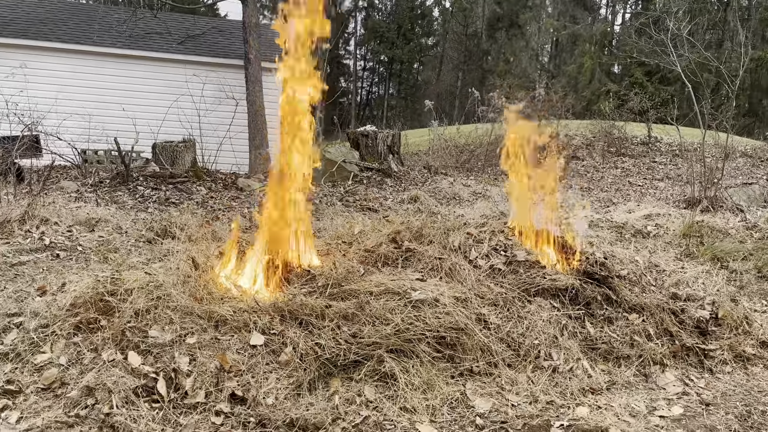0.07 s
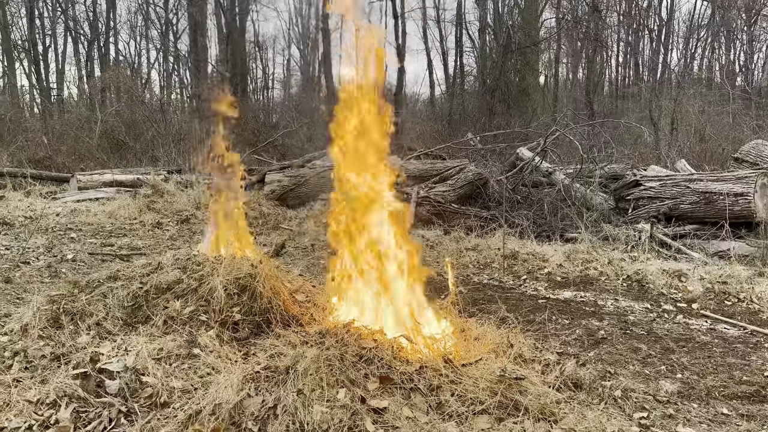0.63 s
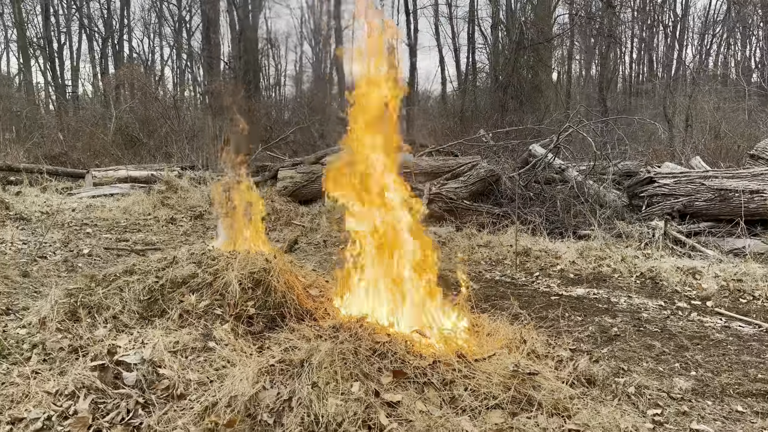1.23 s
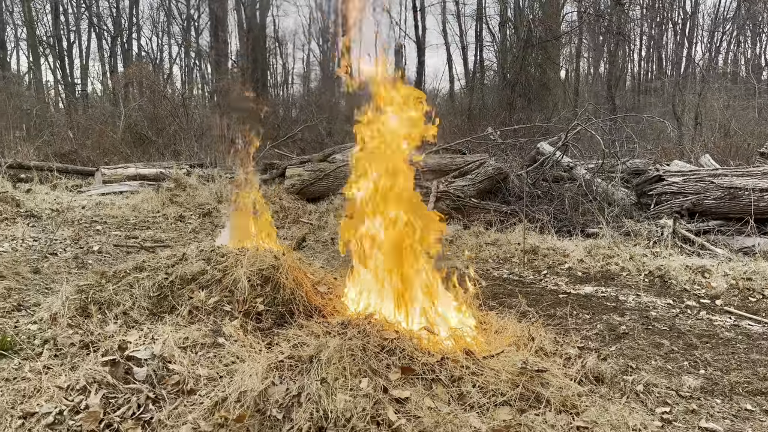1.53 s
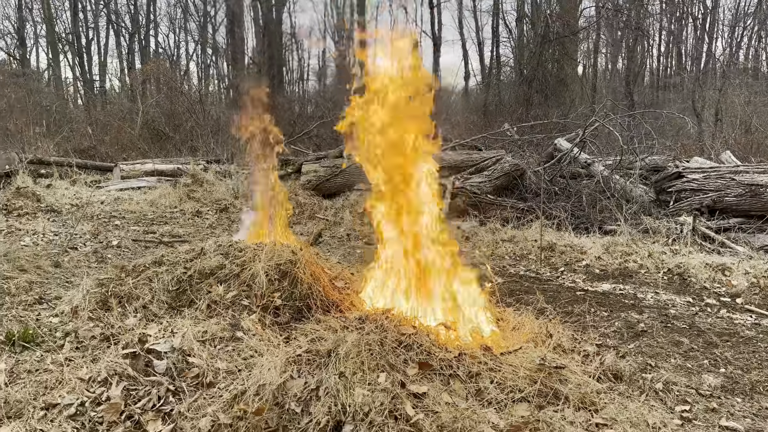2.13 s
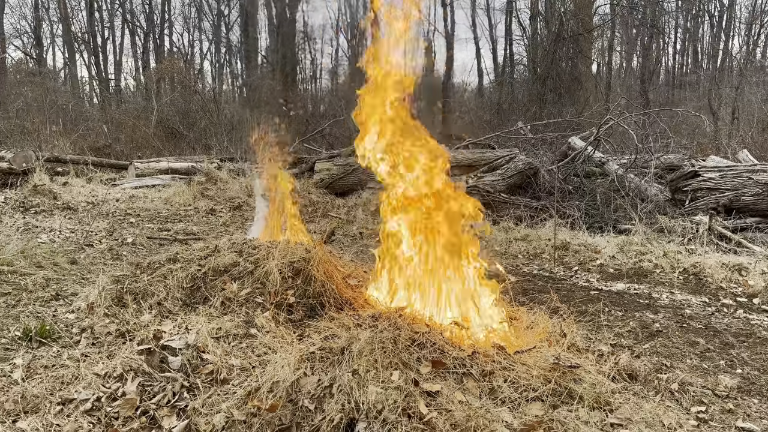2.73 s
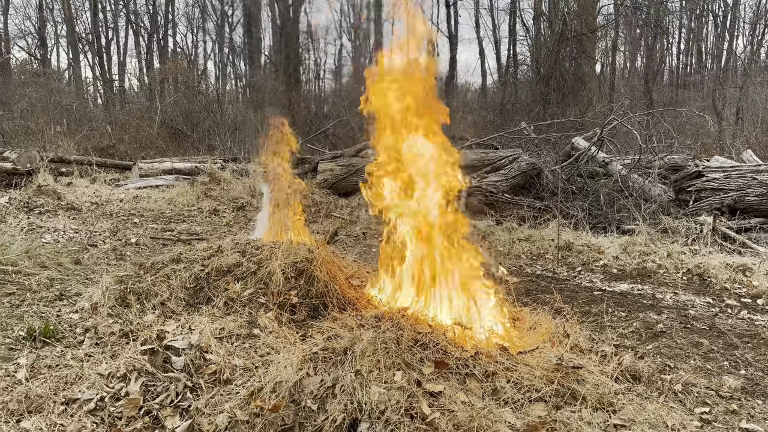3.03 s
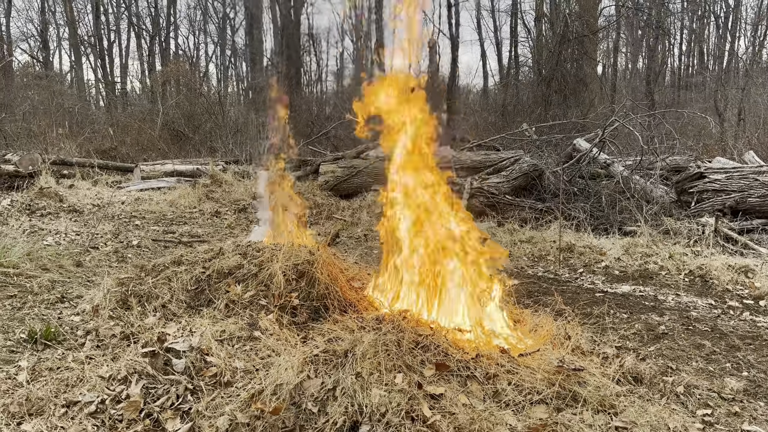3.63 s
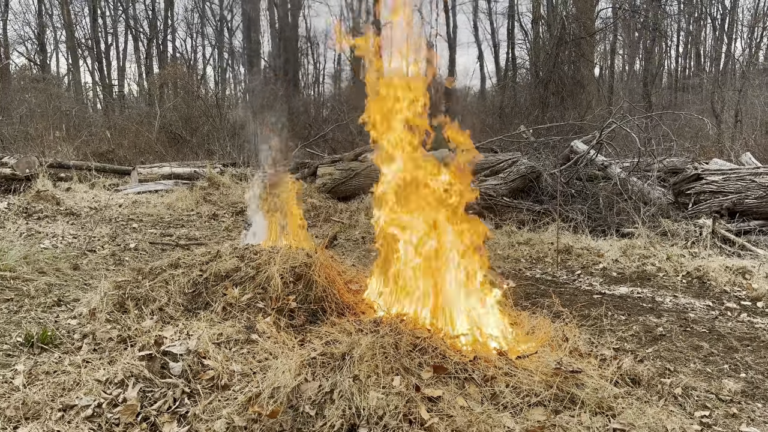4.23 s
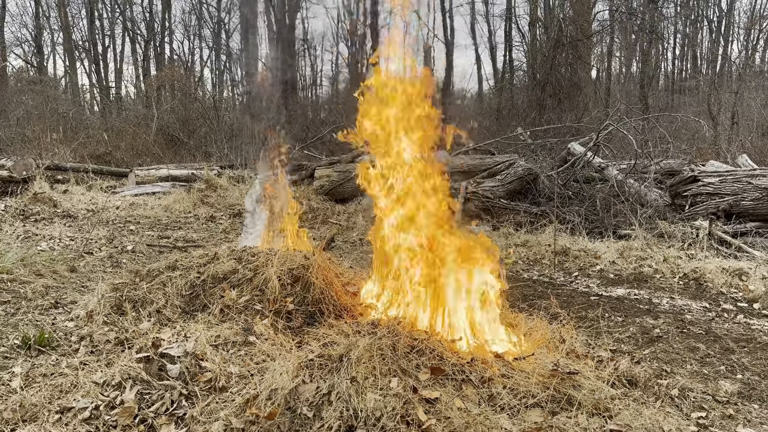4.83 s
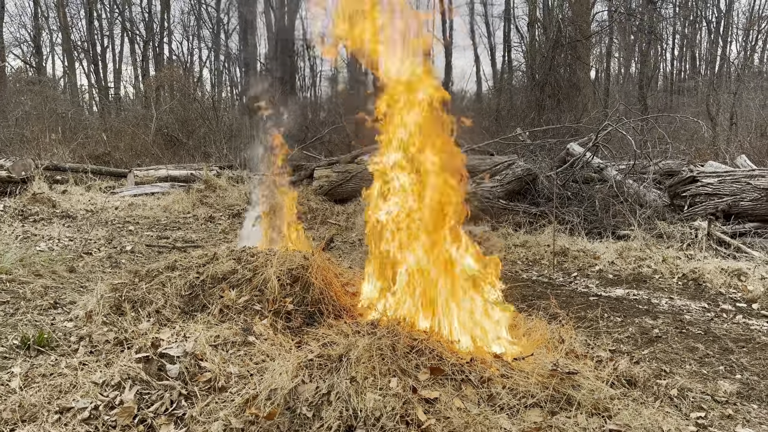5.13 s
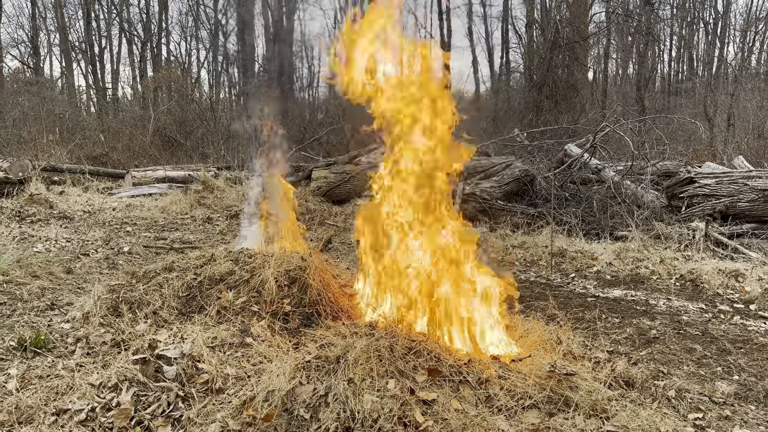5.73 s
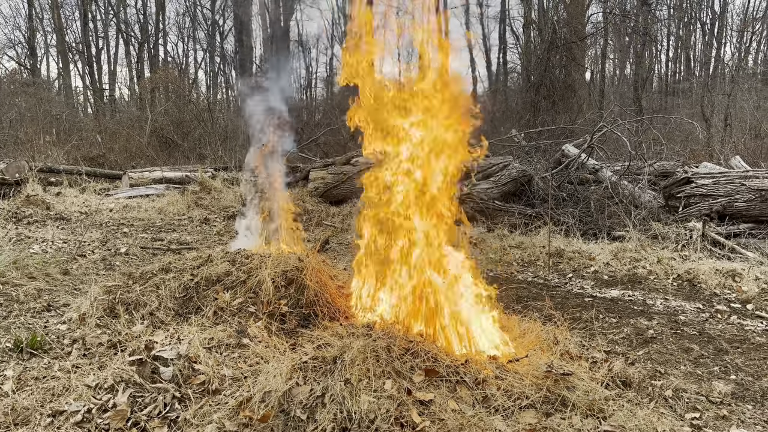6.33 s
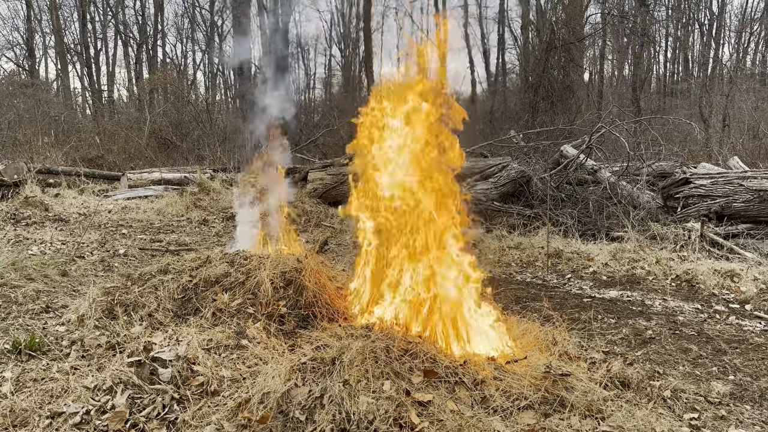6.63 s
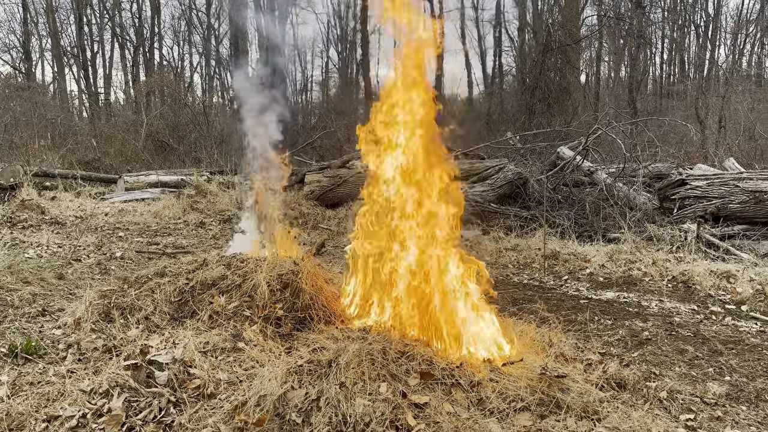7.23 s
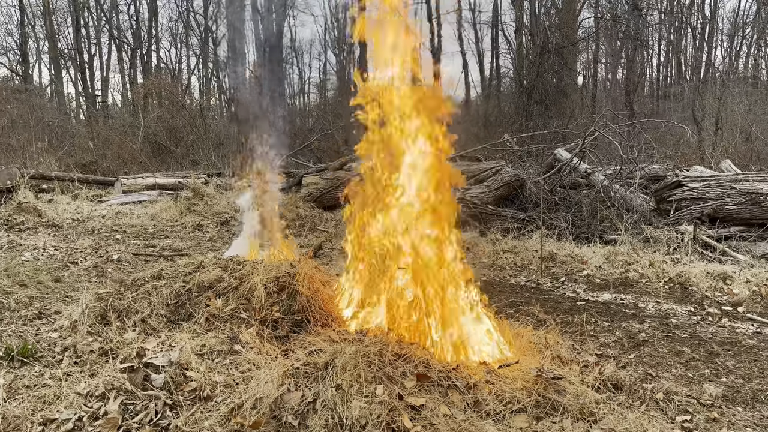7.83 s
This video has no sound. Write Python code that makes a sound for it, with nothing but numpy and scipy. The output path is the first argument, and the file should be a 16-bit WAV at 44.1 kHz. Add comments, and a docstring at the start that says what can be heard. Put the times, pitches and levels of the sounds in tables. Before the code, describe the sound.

A heap of dry weeds and grass burns in an open yard for about eight seconds, a few steps from the microphone. Thin blades crackle densely over a soft sizzle, while thicker stalks burst in sharp, irregular pops, many each second, with faint echoes. Underneath, the flames flutter and give a deep, gently wavering roar, fullest around 2.5 seconds.

A sharp pop comes right at the start. Just before 0.5 seconds the flame gives a soft whump and the whole sound drops out for an instant. Further soft whumps come near 1.6, 1.8 and 3.8 seconds. Stronger pops stand out around 1.9 seconds, and the sharpest crack lands at 6.6. Vapour spurts briefly at 2.7 seconds and more clearly at 7.1, followed by a faint, very brief ring at 7.2. The crackle grows slightly busier and continues to the end.

```python
"""A burning heap of dry weeds and grass, in an open yard, a few steps from a two-port stereo microphone.
The flame column drones and roars, and its tongues flutter and flare. Thick stalks burst in sharp pops
over a dense crackle of thin blades and a soft sizzle of tiny snaps. Vapour spurts from split stalks.
Logs and tree trunks return faint echoes of the snaps. The whole sound drops out for an instant
just before half a second, and a faint, very brief tone rings once near the end."""
import sys
import numpy as np
from scipy import signal
from scipy.fft import rfft, irfft, next_fast_len
from scipy.io import wavfile
from scipy.ndimage import uniform_filter1d

SR = 44100
rng = np.random.default_rng(int(sys.argv[2]) if len(sys.argv) > 2 else 0)


def dump(signal):
    """Clip the signal to [-1, 1] and save it as 16-bit WAV at the path in sys.argv[1]."""
    limited = np.clip(np.atleast_2d(signal).T, -1, 1)
    pcm = np.round(limited * 32767).astype(np.int16)
    wavfile.write(sys.argv[1], SR, pcm)


N = 356769

# strength of the flame column: (time [s], relative drone level [dB], relative roar level [dB])
COLUMN_LEVELS = [(0, -48, -46), (0.33, -51, -39), (0.58, -38.5, -35), (1.85, -34.5, -40),
                 (2.22, -36.5, -34.5), (2.45, -30, -40.5), (2.85, -47.5, -37.5), (3.3, -40, -36),
                 (3.7, -52, -38), (4.1, -36.5, -37.5), (4.7, -44, -42), (5.1, -39, -38.5),
                 (5.6, -43, -41.5), (6.15, -40.5, -39), (6.9, -42.5, -43.5), (7.35, -45.5, -40),
                 (8.08, -40.5, -41)]
# the column's deep drone: (frequency [Hz], relative level [dB])
DRONE_SPECTRUM = [(20, -42), (32, -11), (44, -3), (51, 7), (55, 8.5), (60, 3.5), (68, -9), (90, -53),
                  (200, -80)]
# the column's roar: (frequency [Hz], relative level [dB])
ROAR_SPECTRUM = [(25, -47), (48, -6), (62, 2.5), (72, 9), (82, 1), (92, 5), (102, -7), (135, -14),
                 (200, -39), (400, -75)]
# flutter of the flame tongues, before flicker: (time [s], level [dB])
TONGUE_LEVEL = [(0, -50), (1.0, -46.5), (2.3, -47.5), (3.4, -46), (5.0, -47.5), (6.1, -46.5), (6.8, -46.5),
                (7.25, -45), (8.09, -46)]
# colour of that flutter: (frequency [Hz], relative level [dB])
TONGUE_SPECTRUM = [(30, -30), (80, -15.5), (125, 2.5), (175, -2), (270, -6), (340, -11), (430, -17),
                   (800, -19), (1400, -24), (3000, -45)]
# a tongue flares with a soft whump: (time [s], relative peak level [dB])
TONGUE_FLARES = [(0.424, -25), (1.584, -29.5), (1.791, -28), (3.826, -30)]
# how fast fresh grass catches: (time [s], relative level [dB])
BURN_LEVEL = [(0.0, -59), (0.4, -59.5), (0.59, -54.5), (1.08, -55), (1.76, -53.5), (2.2, -57), (2.7, -57),
              (2.93, -53), (3.2, -51), (3.83, -54), (4.15, -52.5), (4.85, -51.5), (5.2, -53), (5.8, -53),
              (6.02, -52), (6.35, -52), (6.58, -50), (6.93, -54), (7.18, -48.5), (7.5, -54), (8.09, -50)]
# hiss of the tiniest snaps: (frequency [Hz], relative level [dB])
SIZZLE_SPECTRUM = [(300, -9), (600, 8.5), (900, 5.5), (1300, -5.5), (2200, 4.5), (4000, 4.5), (5500, 6),
                   (10000, 0), (13000, 4.5), (15800, -15), (17000, -30)]
# vapour escaping from split stalks: (time [s], relative level [dB], decay [s])
VAPOUR_SPURTS = [(2.742, -44, 0.0096), (6.635, -54, 0.05), (7.133, -36, 0.036)]
# the knock, crack and tick registers of a snap: (low edge [Hz], high edge [Hz])
SNAP_BANDS = [(470, 1370), (1600, 5710), (6800, 15400)]
# the thickest stalks bursting, and the loudest snaps of thin blades: (time [s], ring [Hz], relative level [dB],
# tilt toward treble [dB])
LOUD_SNAPS = [(0.01, 1320, -20, 6.5), (0.101, 1700, -42, -3.5), (0.2282, 12500, -47.5, 14.5),
              (0.2982, 7500, -39, -1), (0.3935, 6300, -38, 2), (0.4176, 1200, -38, 7),
              (0.4523, 10500, -47, 9), (0.4994, 10500, -35.5, -7), (0.5179, 3500, -41.5, -2),
              (0.53, 4500, -43, 3), (0.5485, 7600, -30.5, -1.5), (0.5842, 4500, -46, 5),
              (0.6446, 10500, -45.5, 5), (0.677, 890, -35, 6), (0.734, 10800, -27, -1),
              (0.7679, 10500, -29.5, -2), (0.8213, 9600, -38, 3), (0.835, 5150, -30, 3),
              (0.9539, 4130, -32, 3), (1.0293, 5800, -33, -1.5), (1.059, 870, -32, 8.5),
              (1.132, 10500, -38.5, -3), (1.1783, 10500, -43, 6), (1.1949, 10500, -44, 5),
              (1.2341, 10500, -34, -2), (1.2692, 7900, -30.5, -1), (1.279, 1250, -25, 3),
              (1.287, 10500, -39, -1), (1.3373, 7800, -38, 1), (1.3672, 870, -31, 12.5),
              (1.5871, 10900, -25.5, -5.5), (1.6023, 9610, -28.5, -2), (1.6107, 6000, -26.5, 0),
              (1.7106, 726, -25.5, 11), (1.718, 10500, -36.5, 1), (1.7591, 6200, -29.5, 3),
              (1.8784, 7500, -41, 0), (1.9034, 720, -18.5, 10.5), (1.934, 2000, -43, 11),
              (2.0136, 10500, -39, 0), (2.043, 2320, -22.5, 0.5), (2.149, 1430, -29, 1),
              (2.156, 10500, -41, 0.5), (2.1764, 10500, -39, 1), (2.2057, 13000, -33.5, -0.5),
              (2.2896, 7900, -32.5, -4.5), (2.3032, 5700, -41.5, 8.5), (2.349, 7600, -32.5, 1),
              (2.406, 885, -35.5, 11), (2.4576, 7660, -34, 0), (2.4737, 710, -26.5, 14.5),
              (2.5554, 7500, -37, 0), (2.7305, 9370, -31, 2), (2.7528, 7860, -32, -10),
              (2.7672, 11500, -24.5, -4), (2.7886, 1400, -34, 3), (2.817, 1960, -35, 10.5),
              (2.8532, 2480, -30, 5.5), (2.8885, 10500, -33, -9), (2.902, 13000, -31.5, 1),
              (2.934, 796, -30, 14), (3.0042, 9200, -36.5, 0), (3.0183, 9000, -43, 1),
              (3.0629, 8910, -31, -7), (3.1046, 1500, -32, 5), (3.1253, 9100, -30.5, 2.5),
              (3.1427, 7500, -54, -2), (3.163, 5200, -33.5, 1), (3.173, 10500, -44, 8),
              (3.184, 13000, -32, -1), (3.246, 880, -30.5, 11), (3.254, 7600, -42, 5),
              (3.2777, 7500, -47, 3), (3.2906, 2600, -29.5, 4.5), (3.3053, 7860, -31, -6),
              (3.328, 2600, -32.5, 7), (3.3424, 10500, -45, 5), (3.389, 780, -25.5, 13.5),
              (3.4221, 4700, -39.5, 4), (3.523, 6000, -40, 0), (3.5672, 5100, -36, -4),
              (3.6017, 7500, -38, -3), (3.6633, 1320, -31.5, 10), (3.6826, 6400, -36, 1),
              (3.7261, 2000, -31.5, 9.5), (3.763, 5500, -38, 0), (3.781, 7470, -35.5, 3),
              (3.814, 1930, -30.5, 11.5), (3.9413, 4700, -38, -3), (3.9635, 1770, -30.5, 10),
              (3.9843, 10500, -41, 2), (4.032, 3000, -33.5, 1), (4.052, 804, -30.5, 4.5),
              (4.0614, 7000, -32, 3), (4.112, 3900, -35.5, 1), (4.1425, 10900, -29, -2.5),
              (4.1572, 9400, -34, 1), (4.257, 1600, -38, 1), (4.293, 10500, -36.5, -1.5),
              (4.308, 3420, -44.5, 17), (4.386, 13000, -44, 10), (4.4214, 9900, -30.5, -1),
              (4.428, 6500, -33.5, 0), (4.464, 3600, -30.5, 2.5), (4.5331, 1500, -39, -2),
              (4.5455, 3100, -40, -5), (4.554, 12100, -29, -5.5), (4.611, 12400, -31, -0.5),
              (4.6318, 8690, -33, 0), (4.6682, 7500, -39, -1), (4.763, 3070, -38.5, 4),
              (4.8124, 4290, -33.5, 4), (4.84, 4500, -43, 1), (4.893, 1000, -33, 6.5),
              (4.9205, 1600, -36.5, 2), (4.9595, 4500, -48, 4), (4.9828, 1320, -34.5, 12.5),
              (5.157, 7500, -40.5, 1), (5.185, 7000, -34, 2.5), (5.335, 8800, -46, 7),
              (5.3967, 2040, -31, 8), (5.423, 7660, -30.5, -2), (5.5771, 10500, -40, -2),
              (5.653, 8000, -32.5, -5), (5.9055, 3500, -42.5, 8), (5.95, 5500, -36.5, 2),
              (5.978, 3730, -35.5, -3), (6.0257, 6460, -29, 2), (6.089, 10500, -37, 0.5),
              (6.1398, 7900, -35, -3), (6.1757, 7100, -29, -4.5), (6.228, 10500, -34.5, -3.5),
              (6.2833, 7500, -43, 1), (6.3227, 7500, -44, -1), (6.435, 10000, -41, 3),
              (6.462, 3000, -41, 12), (6.477, 1300, -32.5, 5.5), (6.5494, 8900, -24.5, -2),
              (6.562, 7500, -35, 1), (6.585, 7600, -31, 3), (6.6102, 3800, -16, 0.5),
              (6.646, 2000, -40, 3), (6.6757, 4320, -33, 5), (6.6891, 650, -29, 11),
              (6.726, 8200, -31.5, -2), (6.784, 4540, -34.5, 2.5), (6.796, 9000, -37, 0),
              (6.8273, 7500, -40, -6), (6.9172, 4450, -34, 5), (7.0069, 6000, -42, 0),
              (7.032, 1080, -27.5, -1), (7.0483, 9000, -32, -6), (7.0574, 7100, -29.5, -4.5),
              (7.1217, 10400, -31.5, 1), (7.1332, 1090, -23, 10), (7.141, 4630, -34, 9),
              (7.203, 8690, -32, -3.5), (7.309, 9860, -31.5, -3), (7.3424, 10500, -40, 0),
              (7.356, 1490, -29, 5), (7.3838, 2450, -27, -0.5), (7.501, 7400, -32.5, 1.5),
              (7.535, 10500, -41.5, 5), (7.5469, 746, -31, 6.5), (7.6317, 7500, -42, 0),
              (7.6546, 1800, -37, 2), (7.669, 4000, -42, 2), (7.716, 7500, -41.5, 3),
              (7.7242, 5000, -41, 5), (7.7644, 667, -25, 8), (7.775, 900, -35, 8),
              (7.799, 10200, -30, -5.5), (7.8306, 1890, -33.5, 5), (7.869, 1640, -35.5, -3.5),
              (7.9165, 2000, -40, 7), (8.029, 950, -31, 7.5)]
# a brief dropout of the whole sound: (time [s], gain [dB])
DROPOUT = [(.455, 0), (.466, -20), (.474, -18), (.492, 0)]
# width of diffuse sound at the microphone: (frequency [Hz], relative side minus mid [dB])
DIFFUSE_WIDTH = [(40, -31), (80, -25), (160, -21), (330, -15), (600, -2.5), (1600, -3), (1900, -24),
                 (3200, 1.5), (4300, -20), (5300, 6), (8300, -36), (12000, -22), (13500, -9), (15500, -17)]
# colour shared by both microphone ports: (frequency [Hz], gain [dB])
MIC_COLOUR = [(500, 5), (820, 4), (1100, -2), (1350, 2), (1615, -2.5), (1680, 0), (1900, -1.04),
              (2600, -0.2), (3200, -0.96), (4400, -0.1), (5250, -4), (7000, -0.5), (8300, -1),
              (10500, -0.5), (13500, -2), (15700, -6), (16500, -31)]
# balance between the ports: (frequency [Hz], left minus right [dB])
MIC_BALANCE = [(300, 12), (550, 4.5), (850, 1.5), (1100, 2.5), (1500, 0), (2200, 0.5), (3200, 5),
               (3800, 2.5), (5200, 2.5), (6500, 1.3), (9000, -0.5), (16000, 0.5)]
# phase between the ports: (frequency [Hz], left lead [rad])
MIC_PHASE = [(300, -1.5), (750, 0.5), (1000, 0.3), (1200, -1.78), (1570, 3), (1800, -0.5), (2900, 1.07),
             (3800, 0.64), (4700, 0.96), (5500, -1.1), (6700, -1.48), (8300, -3), (11000, -5.5),
             (13000, -6.5), (15000, -10.5)]

SIDES = np.array([[.5], [-.5]])   # splits a difference between left and right


def from_db(db):
    """Decibels to gain."""
    return 10 ** (np.asarray(db) / 20)


def rms_one(x):
    """Scale to rms 1."""
    return x / np.sqrt(np.mean(x ** 2) + 1e-20)


def in_time(rows):
    """The columns of a curve table at every sample."""
    s, *columns = np.transpose(rows)
    return [np.interp(np.arange(N) / SR, s, c) for c in columns]


def at_hz(points, hz):
    """Read a spectrum on a log-frequency axis."""
    f, value = np.transpose(points)
    return np.interp(np.log(hz + 1e-9), np.log(f), value)


def drift(rate_hz):
    """A random wander of rms 1 that turns about rate_hz times a second."""
    beats = np.arange(N) / SR * rate_hz
    return rms_one(np.interp(beats, np.arange(4096), rng.standard_normal(4096)))


def stereo_noise(spectrum, side_db):
    """Diffuse coloured noise at the microphone, rms 1; side_db widens it."""
    size = next_fast_len(N, real=True)
    hz = np.fft.rfftfreq(size, 1 / SR)
    mid, side = rfft(rng.standard_normal((2, size)))
    width = from_db(at_hz(DIFFUSE_WIDTH, hz) + side_db)
    pair = (mid + width * side * 2 * SIDES) / np.sqrt(1 + width ** 2)
    return rms_one(irfft(pair * from_db(at_hz(spectrum, hz)), size)[:, :N])


def flame_column(drone_gain_db=-1, evenness=0.64, puff_s=0.097):
    """The flame column over the heap drones and roars in deep puffs."""
    drone_db, roar_db = in_time(COLUMN_LEVELS)
    drone = stereo_noise(DRONE_SPECTRUM, side_db=-6.0)
    roar = stereo_noise(ROAR_SPECTRUM, side_db=-1.5)
    column = from_db(drone_db + drone_gain_db) * drone + from_db(roar_db) * roar
    swell = np.sqrt(uniform_filter1d((drone[0] + roar[0]) ** 2, int(puff_s * SR)) / 2 + 1e-6)
    return column / swell ** evenness   # a steady draught evens out the puffs


def flame_tongues(flicker_db=2.5, flare_gain_db=-7, flare_peak_s=0.0032, flare_width_s=0.0058):
    """Tongues of flame flutter steadily, and now and then one flares up."""
    steady_db, = in_time(TONGUE_LEVEL)
    level = from_db(steady_db + flicker_db * drift(60))
    for s, peak_db in TONGUE_FLARES:
        from_peak_s = np.arange(N) / SR - s - flare_peak_s
        level += from_db(peak_db + flare_gain_db) * np.exp(-(from_peak_s / flare_width_s) ** 2)
    return level * stereo_noise(TONGUE_SPECTRUM, side_db=2.0)


def sizzle(burn_db, gain_db=-4.0, grain_db=3.5, spurt_rise_s=0.001):
    """Countless tiny snaps merge into a grainy hiss, which swells where a split stalk lets out vapour."""
    level = from_db(burn_db + gain_db)
    for s, spurt_db, decay_s in VAPOUR_SPURTS:
        age = np.maximum(np.arange(N) / SR - s, 0)
        level += from_db(spurt_db) * np.exp(-age / decay_s) * (1 - np.exp(-age / spurt_rise_s))
    grain = from_db(grain_db * drift(450))
    return level * grain * stereo_noise(SIZZLE_SPECTRUM, side_db=-4.5)


def ground_bounce(hz, count, bounce_db=-6.5, bounce_s=0.001124, spread=0.21, dull_hz=4000):
    """The ground returns each snap, duller and about a millisecond late: a hollow, woody colour."""
    delay_s = bounce_s * np.exp(spread * rng.standard_normal((count, 1, 1)))
    return 1 + from_db(bounce_db) * np.exp(-2j * np.pi * hz * delay_s) / (1 + 1j * hz / dull_hz)


def snaps(rows, tear_s, tear_db, scatter_s, scatter_db, side_db, variety_db, ring_db, ring_q,
          spread_s, pan_db, size, lead_s=.0013, give_s=.0002, nominal_s=.005):
    """Fibres give, the stalk bursts in a pressure step and tears on; the sound scatters in the heap."""
    # rows: (time [s], ring [Hz], knock [dB], crack [dB], tick [dB])
    s, ring_hz, *levels_db = np.transpose(rows)[:, :, None, None]
    hz = np.fft.rfftfreq(2 * size, 1 / SR) + 1
    t = (np.arange(size) - round(lead_s * SR)) / SR   # zero at the burst
    fibres, mid, side, traits = rng.standard_normal((len(s), 4, 1, size)).swapaxes(0, 1)
    place, lean, toughness = traits[:, 0, :3].T[:, :, None, None]
    length = from_db(variety_db * np.tanh(toughness))   # brittle stalks click, tough ones rasp
    tear_shape = np.exp(-np.maximum(t / (tear_s * length), -t / give_s))
    tearing = from_db(tear_db) * fibres * np.abs(fibres) * tear_shape
    scatter_shape = np.exp(-np.maximum(t / (scatter_s * length), -t / give_s))
    scatter = from_db(scatter_db) * (mid + from_db(side_db) * SIDES * side) * scatter_shape
    ring = 1 + from_db(ring_db) / (1 + 1j * ring_q * (hz / ring_hz - ring_hz / hz))
    low_cut_hz = np.minimum(0.53 * ring_hz, 860)   # a stalk radiates little far below its ring
    above = 1j * hz / low_cut_hz
    radiation = np.abs(above ** 2 / (above ** 2 + above + 1)) ** 2
    burst = rfft((t == 0) + tearing + scatter, 2 * size) * ring * radiation * ground_bounce(hz, len(s))
    spectrum = 0
    for band_hz, level_db in zip(SNAP_BANDS, levels_db):   # all registers strike at once: a dry crack
        bandpass = signal.butter(3, band_hz, "band", fs=SR, output="sos")
        part = burst * np.abs(signal.sosfreqz(bandpass, hz, fs=SR)[1])
        energy = np.mean(np.abs(part) ** 2, axis=(1, 2), keepdims=True)
        spectrum = spectrum + part * from_db(level_db) * np.sqrt(nominal_s * SR / energy)
    # the place in the heap shifts level and arrival time between the ports
    pan = from_db(pan_db * lean * SIDES)
    arrival = np.exp(-2j * np.pi * hz * spread_s * place * SIDES)
    waves = irfft(spectrum * pan * arrival)
    starts = np.clip(s.ravel() * SR, 0, N - 1).astype(int)
    out = np.zeros((2, N + 2 * size))
    for start, wave in zip(starts, waves):
        out[:, start:start + 2 * size] += np.roll(wave, size // 2, axis=1)
    return out[:, size // 2:size // 2 + N]


def blade_crackle(burn_db, count=2000, crowding=.7, cluster_db=3.8, base_db=-44.5, growth=0.28):
    """Thin blades snap in clusters, faster and harder where the grass catches."""
    heat_db = burn_db - burn_db.mean()
    activity = np.cumsum(from_db(crowding * heat_db + cluster_db * drift(45)))
    when, weakness, thinness = rng.random((count, 3)).T
    at = np.searchsorted(activity, when * activity[-1])
    level_db = base_db + growth * heat_db[at] - 20 * np.log10(1 + 10 * weakness)   # most snaps are weak
    ring_hz = 1500 * 9 ** thinness   # thin blades ring higher and tick brighter
    bright_db = 4 * np.sqrt(12) * (thinness - .5)
    knock_db = level_db - 13 - bright_db
    crack_db = level_db - 3.5 - .5 * bright_db
    tick_db = level_db + .5 * bright_db
    rows = np.column_stack([at / SR, ring_hz, knock_db, crack_db, tick_db])
    return snaps(rows, tear_s=.0007, tear_db=-20, scatter_s=.0024, scatter_db=-27, side_db=1.0,
                 variety_db=5, ring_db=9.0, ring_q=0.7, spread_s=6e-6, pan_db=-1.0, size=320)


def stalk_pops(gain_db=-0.07, fall_db_per_octave=5.0):
    """Thick stalks burst one by one, and the loudest thin blades tick among them; each favours the register
    where it rings, under its own tilt."""
    s, ring_hz, level_db, tilt_db = np.transpose(LOUD_SNAPS)
    centre_hz = np.sqrt(np.prod(SNAP_BANDS, axis=1, keepdims=True))
    knock_db, crack_db, tick_db = level_db - fall_db_per_octave * np.abs(np.log2(centre_hz / ring_hz))
    rows = np.column_stack([s, ring_hz, knock_db - 4 - tilt_db, crack_db, tick_db - 1 + tilt_db])
    pops = snaps(rows, tear_s=.0009, tear_db=-19, scatter_s=.004, scatter_db=-24.5, side_db=-2,
                 variety_db=5.5, ring_db=0, ring_q=1.2, spread_s=5e-6, pan_db=0.26, size=640)
    return from_db(gain_db) * pops


def brief_ring(at_s=7.2, pitch_hz=1730, level_db=-46, width_s=0.0079):
    """A faint, very brief tone rings once near 1.7 kHz."""
    t = np.arange(N) / SR - at_s
    return from_db(level_db) * np.exp(-(t / width_s) ** 2) * np.sin(2 * np.pi * pitch_hz * t)


def yard_echoes(x, echo_db=-25, decay_s=0.037, delay_s=0.015, dull_hz=4500):
    """Logs and tree trunks around the yard send back a faint, dull spray of echoes."""
    t = np.arange(SR // 2) / SR
    spray = rng.standard_normal((2, len(t))) ** 3 * np.exp(-t / decay_s) * (t > delay_s)
    spray = signal.sosfilt(signal.butter(1, dull_hz, fs=SR, output="sos"), spray)
    return from_db(echo_db) * signal.fftconvolve(x, rms_one(spray) / np.sqrt(len(t)), axes=1)[:, :N]


def microphone_ports(x):
    """The ports colour the sound; the left is mostly louder, and treble reaches the right first."""
    size = next_fast_len(N + 4096)
    hz = np.fft.rfftfreq(size, 1 / SR)
    gain = from_db(at_hz(MIC_COLOUR, hz) + SIDES * at_hz(MIC_BALANCE, hz))
    phase = np.exp(1j * SIDES * at_hz(MIC_PHASE, hz))
    return irfft(rfft(x, size) * gain * phase, size)[:, :N]


def scene():
    """From a few steps away: pops, crackle and sizzle in the heap, under the roar of the flame."""
    burn_db, = in_time(BURN_LEVEL)
    dropout_db, = in_time(DROPOUT)
    heap = stalk_pops() + blade_crackle(burn_db) + sizzle(burn_db) + brief_ring()
    heap_at_mic = microphone_ports(heap + yard_echoes(heap))
    flame = flame_column() + flame_tongues()
    return from_db(dropout_db) * (heap_at_mic + flame)


def record(dry, ceiling=.9, cutoff_hz=16600):
    """The recorder clips peaks just under full scale, then cuts the top steeply."""
    lowpass = signal.ellip(10, .1, 80, cutoff_hz, fs=SR, output="sos")
    return signal.sosfilt(lowpass, np.clip(dry, -ceiling, ceiling))


dry = scene()
out = record(dry)
dump(out)
```